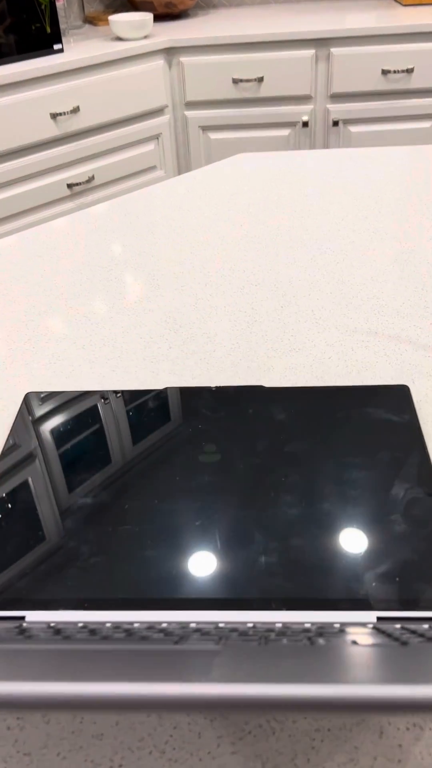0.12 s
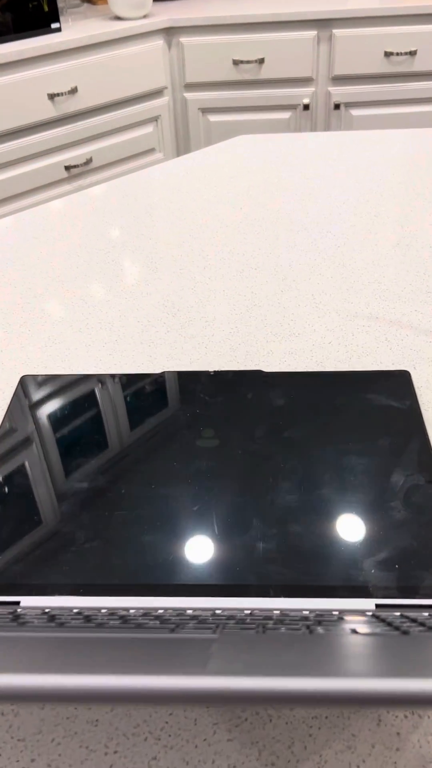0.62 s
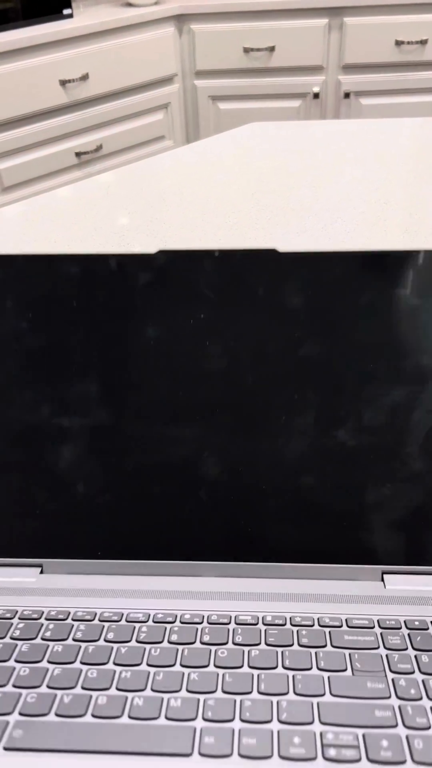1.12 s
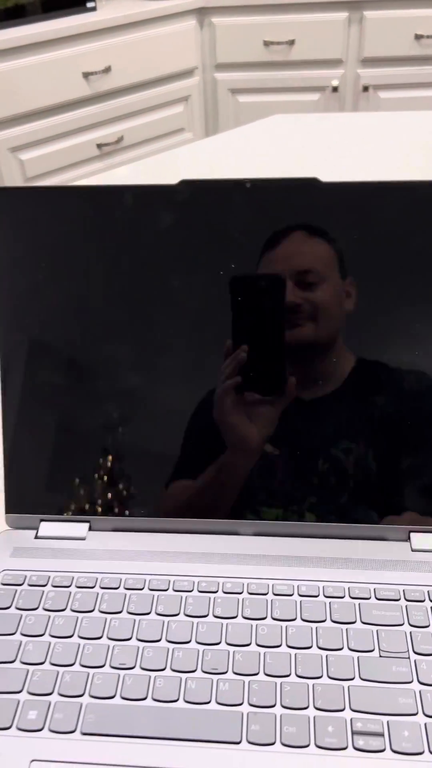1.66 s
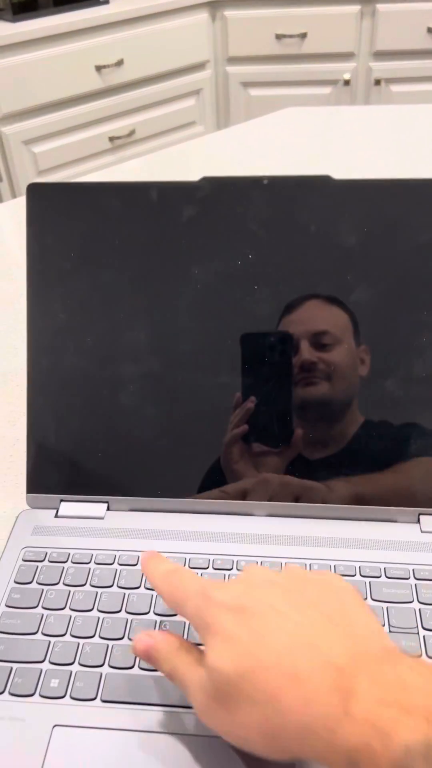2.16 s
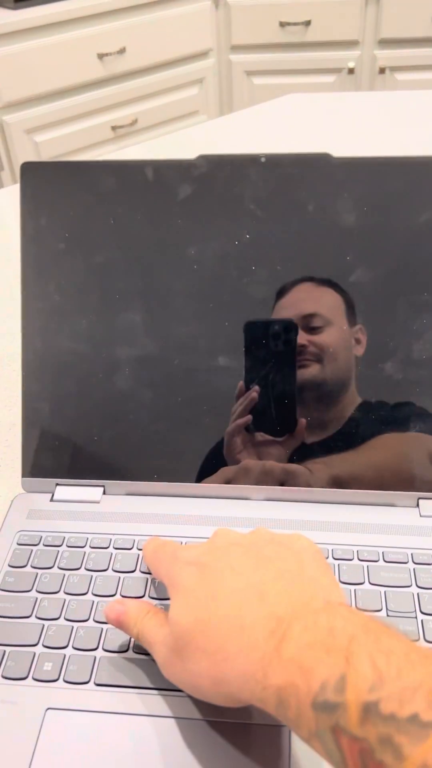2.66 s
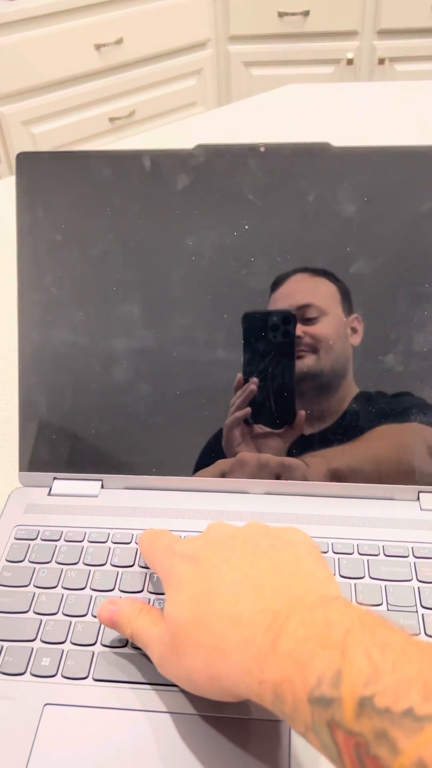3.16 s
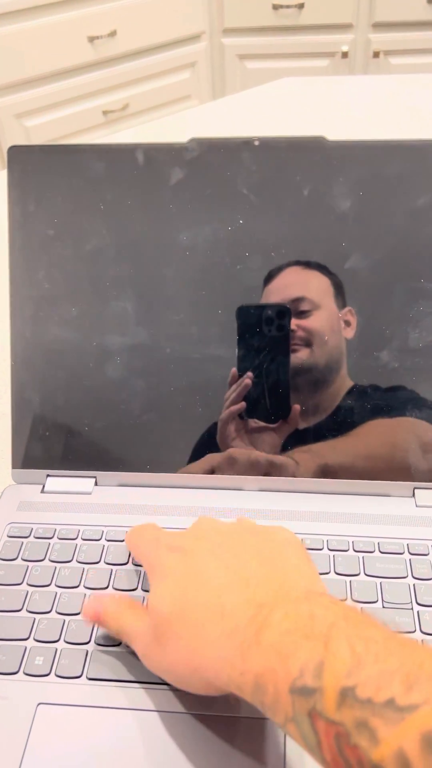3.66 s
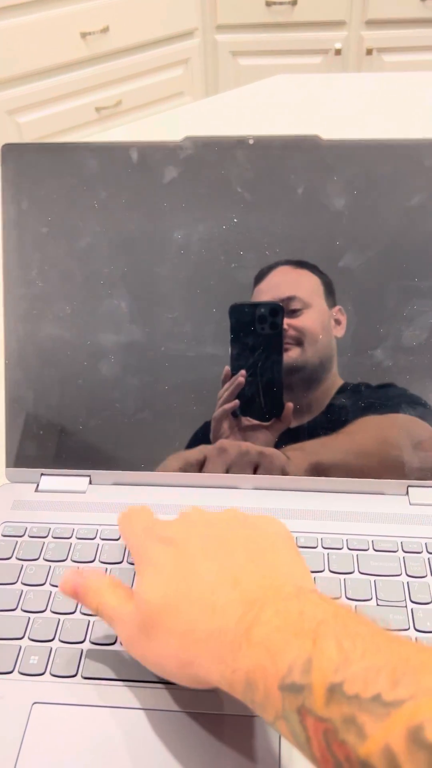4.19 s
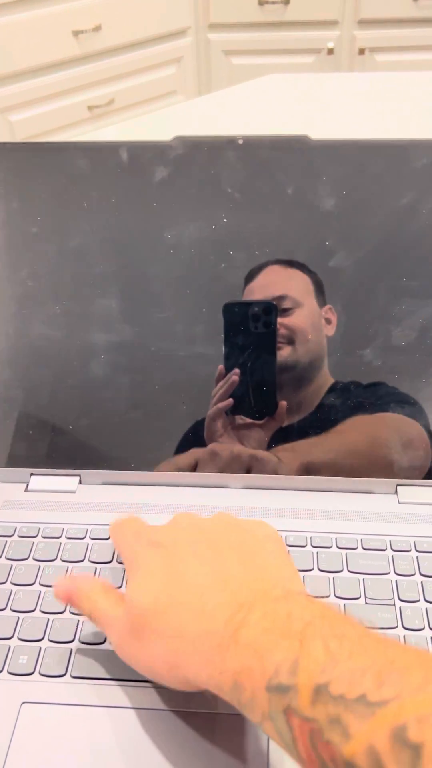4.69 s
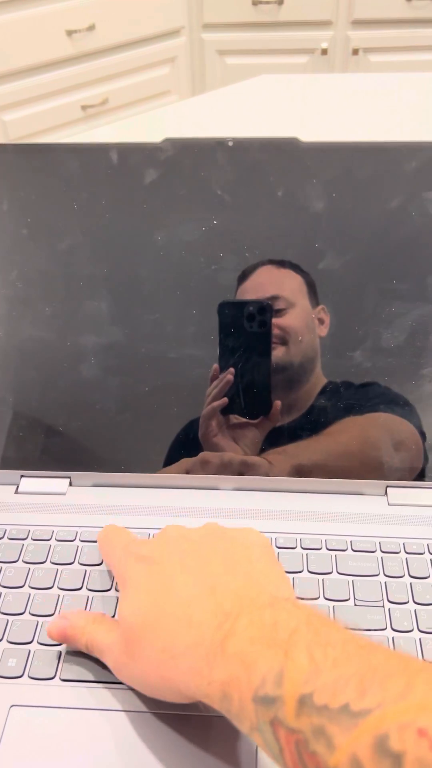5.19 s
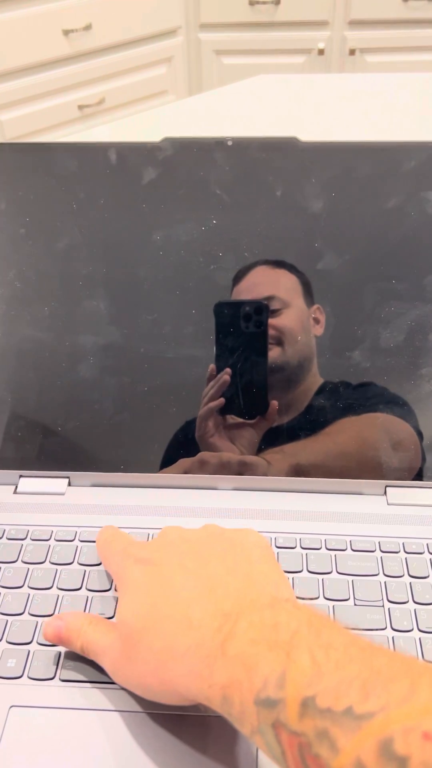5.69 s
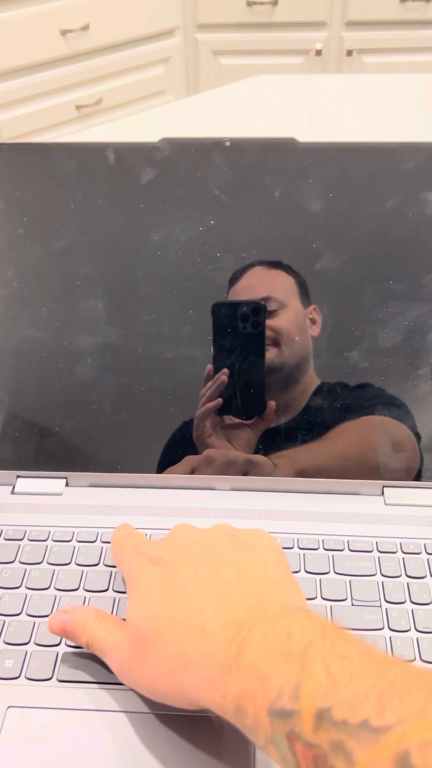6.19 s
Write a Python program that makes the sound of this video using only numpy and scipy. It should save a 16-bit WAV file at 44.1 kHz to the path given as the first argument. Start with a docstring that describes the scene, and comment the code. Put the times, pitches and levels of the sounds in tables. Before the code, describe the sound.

Close handheld stereo pickup in a hard-surfaced kitchen. Faint dry skin rubs and tiny ticks come first, then two sudden cracking knocks on a thin laptop case, with short mid-pitched ringing, a bounce and a low counter thump. Near quiet returns with barely audible brushing. Light, dry key clicks then run in a regular series, press and release, becoming softer and sparser towards the end over gentle appliance hum.

```python
"""Two hard knocks ring the case of a laptop, which bounces on the counter after each: ringing modes,
a noisy crack and a slow swell of the slab. Then a finger taps a key again and again, mostly lighter:
bursts of tiny contacts excite keycap resonances. A hand brushes the laptop (stick-slip hiss, catches,
ticks). Sparse echo taps make the room; shaped noise and fuzzy hums make the quiet kitchen behind it."""
import sys
import numpy as np
from scipy import signal
from scipy.fft import rfft, irfft, next_fast_len
from scipy.io import wavfile
from scipy.ndimage import uniform_filter1d

SR = 44100
rng = np.random.default_rng(int(sys.argv[2]) if len(sys.argv) > 2 else 0)


def voltage_ratio(decibels):
    """Convert decibels (scalar or array-like) to amplitude ratios, 20 dB per decade."""
    exponent = np.asarray(decibels, float) / 20
    return 10 ** exponent


def int16_out(signal):
    """Quantize to a 16-bit WAV file."""
    q = np.round(np.clip(np.atleast_2d(signal).T, -1, 1) * 32767)
    wavfile.write(sys.argv[1], SR, q.astype(np.int16))


N = 278834

# stereo spread of diffuse sound: (frequency [Hz], side gain [dB])
DIFFUSE_SIDE = [(30, -35.5), (60, -24.5), (110, -20), (200, -15.5), (380, -10.5), (700, -3), (1290, -5),
                (2380, -7.5), (4400, -1.5), (8120, -0.5), (15000, -1.5)]


def evened(x):
    """Scales to rms 1."""
    return x / np.sqrt(np.mean(x ** 2) + 1e-20)


def read(points, hz):
    """Value of a curve at hz, in straight lines over log frequency."""
    f, value = np.transpose(points)
    return np.interp(np.log(hz + 1), np.log(f + 1), value)


def add(mix, start_s, sound):
    """Mixes a sound in at start_s seconds."""
    part = mix[round(start_s * SR):][:len(sound)]
    part += sound[:len(part)]


def coloured(x, points, turn=1):
    """Filters by a spectrum in dB, with an optional phase turn."""
    length = x.shape[-1]
    size = next_fast_len(length + 512)
    gain = voltage_ratio(read(points, np.fft.rfftfreq(size, 1 / SR)))
    return irfft(rfft(x, size) * turn * gain, size)[..., :length]


def resonate(x, hz, width):
    """Resonance of gain 1: shifts hz down to zero, smooths, and shifts back."""
    turn = np.exp(2j * np.pi * np.cumsum(hz * np.ones(len(x))) / SR)
    r = np.exp(-np.pi * width / SR)
    smooth = signal.lfilter([1 - r], [1, -r], x / turn + 1e-18)
    return 2 * (turn * smooth).real


def resonate_twice(x, hz, width, second_width):
    """Two resonances in a row at one frequency, for steeper skirts."""
    return resonate(resonate(x, hz, width), hz, second_width)


def case(tilt_db, lag=.0009, ring=1, rise=0.00049, turns=0.64):
    """The struck case: bending waves bring the high modes first; each mode needs part of a turn to build."""
    # modes of the case: (frequency [Hz], relative level [dB], free ring t60 [s])
    modes = [(388.8, -2, 0.029), (481.4, -4.5, 0.017), (619, 1, 0.023), (837, -10.5, .012),
             (1064, -7, 0.017), (1261, -9.5, 0.018), (2434, 2.5, 0.0087), (2700, -12, 0.012),
             (3200, -0.5, 0.0045), (4340, -8, .008), (4710, -9, .01), (7270, -19, 0.012),
             (9754, -34, 0.0033)]
    hz, db, t60 = np.transpose(modes)[:, :, None]
    t = np.maximum(np.arange(9000) / SR - lag / (1 + (hz / 2200) ** 2), 0)
    decay = voltage_ratio(db + tilt_db * np.log2(hz / 1000) - 60 * t / (ring * t60))
    build = 1 - np.exp(-(t / (rise + turns / hz)) ** 2)
    # low neighbours swing opposite ways and merge; high ones leave gaps
    sides = (-1) ** np.cumsum(hz < 1500, axis=0)
    ringing = (sides * decay * build * np.sin(2 * np.pi * hz * t)).sum(0)
    # a small case radiates no bass
    thin = signal.butter(3, 280, "highpass", fs=SR, output="sos")
    sound = signal.sosfilt(thin, ringing)
    return sound / abs(sound).max()


def blow(db, tilt_db, lag, ring):
    """One impact: the modes of the case and the noisy crack of a hard edge."""
    # colour of the crack: (frequency [Hz], relative level [dB])
    crack_colour = [(1180, -34.5), (1800, -30), (2100, -9.5), (2430, -13.5), (5440, -23.5), (9060, -20.5),
                    (15600, -42), (16300, -54.5)]
    t = np.arange(1500) / SR
    noise = evened(coloured(rng.standard_normal(1500), crack_colour))
    crack = noise * voltage_ratio(-15.0 - 60 * t / 0.055) * (1 - np.exp(-t / 0.0014))
    sound = voltage_ratio(db - 0.5) * case(tilt_db, lag, ring)
    add(sound, 0, voltage_ratio(db) * crack)
    return sound


def knocks():
    """Blows with near echoes, a slab that swells late, and bounces; second output is what fills the room."""
    # knocks: (time [s], nominal level [dB], brightness [dB per octave], lag of the low modes [s],
    # ring length [share of the free ring])
    hits = [(1.593, -2.5, -0.5, .0003, 1.05), (1.8412, -9, 0.5, 0.00037, .7)]
    # the case bounces on the counter after a knock, columns as for the knocks
    bounces = [(1.6213, -21, -1, .0009, 0.49), (1.6248, -17, -0.5, .0005, 0.69),
               (1.8721, -14, -1.5, .0003, .8)]
    # modes of the slab: (frequency [Hz], level over the knock [dB], t60 [s], build-up [s])
    slab = [(44, -26, 0.42, .022), (76, -25.5, 0.19, 0.0073), (112, -26.5, .15, 0.004),
            (185.6, -29.5, 0.52, 0.032)]
    # colour thrown into the room in all directions: (frequency [Hz], relative level [dB])
    thrown_colour = [(40, -18.5), (110, -11.5), (250, -10.5), (400, -9.5), (620, -7.5), (900, -14),
                     (1700, -19.5), (2500, -19.5), (5000, -26), (9000, -27.5), (11000, -35), (16400, -43)]
    # counter and cupboards close by: (delay [s], level [dB])
    edges = [(.0066, -15.5), (.0125, -21), (.017, -19.5)]
    out, thrown = np.zeros(N), np.zeros(N)
    t = np.arange(SR // 3) / SR
    for start_s, db, *touch in hits:
        sound = blow(db, *touch)
        add(out, start_s - .0008, sound)
        for delay, edge_db in edges:
            add(out, start_s + delay, voltage_ratio(edge_db) * sound)
        for hz, slab_db, t60, build in slab:
            swell = (1 - np.exp(-(t / build) ** 2)) * voltage_ratio(db + slab_db - 60 * t / t60)
            add(out, start_s, swell * np.sin(2 * np.pi * hz * t))
        thrown[round(start_s * SR)] = voltage_ratio(db + 34.5)
    for start_s, *touch in bounces:
        softened = signal.lfilter([1 - .35], [1, -.35], blow(*touch))
        add(out, start_s, softened)
    return out, coloured(thrown, thrown_colour)


def rattle(length, rise=0.24):
    """Tiny contacts of uneven size that gather quickly and spread over the length in seconds."""
    t = np.arange(1200) / SR
    draw = rng.standard_normal((1200, 2))
    grains = draw[:, 0] * np.exp(.6 * draw[:, 1])
    u = t / max(length, .001)
    shape = (1 - np.exp(-u / rise)) * np.exp(-u ** 2) + 0.12 * np.exp(-t / 0.006)
    contacts = grains * shape
    return contacts / np.sqrt(np.mean(contacts[:250] ** 2))


def keys():
    """Plastic rattle in the keycap, a thin top tick, and a thump into the case in every key move."""
    # key pressed down, or a similar light key click (5.3976):
    # (time [s], plastic tick [dB], thump into the case [dB], top treble [dB]);
    # levels here and below are nominal, ahead of fixed trims
    presses = [(3.4657, -46, -46, -64), (3.6329, -47.5, -48.5, -65), (3.7976, -47, -51, -60.5),
               (3.9465, -53.5, -53, -84), (4.098, -51, -53, -81), (4.247, -51, -55.5, -75),
               (4.3994, -51.5, -52.5, -72), (4.5535, -56, -54.5, -85), (4.6919, -67, -61, -63),
               (4.8374, -61, -61.5, -67), (4.9935, -60, -60, -77.5), (5.1403, -64.5, -63, -75.5),
               (5.296, -68, -69.5, -81), (5.3976, -62.5, -68.5, -80.5), (5.5769, -70.5, -67, -84.5),
               (5.7638, -59, -67, -89), (6.303, -61.5, -54, -87)]
    # key springing back up, with one small bounce after it (5.2617):
    # (time of the thump [s], plastic tick [dB], top treble [dB])
    releases = [(3.5399, -56, -63), (3.7007, -54.5, -66), (3.8588, -60.5, -66.5), (4.012, -58, -67),
                (4.1597, -56.5, -68), (4.311, -61.5, -69), (4.466, -54, -65), (4.6208, -62.5, -70.5),
                (4.7721, -59, -70), (4.917, -56.5, -64), (5.0784, -61, -68.5), (5.2466, -58, -81.5),
                (5.2617, -62, -80), (5.4439, -68, -88), (5.5603, -66, -82.5), (5.6133, -71.5, -93),
                (5.7418, -60, -77), (5.9068, -63, -78)]
    # keycap resonances, low three thump, high three tick:
    # (centre before scatter [Hz], width of first pass [Hz], relative level [dB])
    cap_modes = [(1050, 760, 1), (1900, 1440, -5.5), (2690, 130, -86), (4040, 1340, 1.5),
                 (7190, 2100, -0.5), (9700, 2000, 1)]
    press_rattle_s, release_rattle_s = 0.00476, .0048
    release_lead_s = .0015  # the cap starts to rattle just before it hits its stop
    travel_s, slower_s_per_db, firm_db = .0015, .0002, -46  # a light finger bottoms out later
    release_thump_db = -5  # thump in the release table's moves, relative to the tick

    top = signal.butter(4, [12600, 15800], "bandpass", fs=SR, output="sos")
    dull = signal.butter(3, 11500, fs=SR, output="sos")  # the cap itself rings little above this
    moves = []
    for start_s, tick_db, thump_db, top_db in presses:
        travel = travel_s + slower_s_per_db * (firm_db - thump_db)
        moves.append((start_s, tick_db, thump_db, top_db, press_rattle_s, travel))
    for stop_s, tick_db, top_db in releases:
        thump_db = tick_db + release_thump_db
        moves.append((stop_s - release_lead_s, tick_db, thump_db, top_db, release_rattle_s, release_lead_s))

    out = np.zeros(N)
    for start_s, tick_db, thump_db, top_db, length, travel in moves:
        contacts, landing = rattle(length), rattle(1.29 * length)
        shift = 1 + 0.04 * rng.standard_normal(len(cap_modes))  # the finger never lands twice alike
        rings = [(hz * k, width, voltage_ratio(db)) for k, (hz, width, db) in zip(shift, cap_modes)]
        tick = sum(g * resonate_twice(contacts, hz, width, 2 * width) for hz, width, g in rings[3:])
        thump = sum(g * resonate_twice(landing, hz, width, 2 * width) for hz, width, g in rings[:3])
        add(out, start_s, voltage_ratio(tick_db - 4.5) * signal.sosfilt(dull, tick))
        add(out, start_s, voltage_ratio(top_db + 5) * signal.sosfilt(top, rattle(0.52 * length)))
        add(out, start_s + travel, voltage_ratio(thump_db + 8.0) * thump)
        add(out, start_s + travel, voltage_ratio(thump_db + 4.5) * case(-7.0))  # the case answers softly
    return out


def rubs():
    """Skin slides on a smooth surface: stick-slip grains in a broad resonance, with a few larger catches."""
    # slides: (time of most pressure [s], level [dB], centre [Hz], swell [dB per s], fade [dB per s])
    slides = [(0.77, -57.5, 7160, 474, 1003), (1.518, -61, 8810, 800.5, 598),
              (2.343, -83.5, 7770, 699.5, 500), (2.8, -86.5, 7900, 417, 500),
              (3.214, -79, 8300, 700.5, 450), (6.1, -88, 8870, 420, 401.5)]
    # the skin sticks and lets go: (time [s], nominal level [dB], length [s])
    catches = [(0.748, -46, 0.006), (0.7662, -42, 0.0042)]
    # resonances of a catch: (frequency [Hz], width of each pass [Hz], relative level [dB])
    catch_rings = [(7800, 1000, 1), (6200, 800, -2), (4600, 2100, -7.5),
                   (2530, 3600, -21), (9000, 1600, -13), (15000, 3100, -28)]
    reach_s = .12  # each slide is computed this long before and after its peak
    out, t = np.zeros(N), np.arange(-reach_s, reach_s, 1 / SR)
    for peak_s, db, hz, swell, fade in slides:
        grains = rng.standard_normal(len(t))
        hiss = resonate_twice(grains, hz, 2200, 4000) + .5 * resonate(grains, hz, 400)
        pressure_db = np.where(t < 0, swell * t, -fade * t)
        add(out, peak_s - reach_s, voltage_ratio(db + pressure_db) * evened(hiss))
    for start_s, db, length in catches:
        grains = rattle(length)
        catch = sum(voltage_ratio(ring_db) * resonate_twice(grains, hz, width, width)
                    for hz, width, ring_db in catch_rings)
        add(out, start_s, voltage_ratio(db + 1.5) * catch)
    return out


def ticks():
    """Small ticks as the hand shifts, and one dull key thump: short rattles, each in one broad ring."""
    # small ticks as the hand shifts on the laptop, and one dull key thump at 5.41:
    # (time [s], rattle level before the ring [dB], ring [Hz], width of each pass [Hz])
    small_sounds = [(0.585, -74.5, 9660, 4970), (0.8478, -76, 8800, 1500), (1.16, -63.5, 3200, 2500),
                    (1.476, -65, 3200, 1190), (5.312, -74.5, 3500, 4000), (5.41, -63, 2000, 2000),
                    (5.461, -76, 9000, 3000), (5.638, -77, 9500, 3000), (5.818, -77.5, 10000, 2500)]
    out = np.zeros(N)
    for start_s, db, hz, width in small_sounds:
        add(out, start_s, voltage_ratio(db) * resonate_twice(rattle(.0045), hz, width, width))
    return out


def kitchen(x):
    """Room echo: sparse taps of random sign, each band dying at its own speed, as mid and side."""
    # decay of the room: (frequency [Hz], t60 [s])
    decay = [(100, 0.68), (260, 0.35), (700, 0.62), (1840, 0.43), (4850, 0.52), (12800, 0.22)]
    # colour of the echo: (frequency [Hz], gain [dB])
    wet_colour = [(100, -2), (500, -10), (2000, -7.5), (6000, -11), (14000, -9.5)]
    taps = np.zeros((2, SR))
    at = np.arange(300, SR - 20, 20) + rng.integers(0, 20, (2, (SR - 301) // 20))
    np.put_along_axis(taps, at, rng.choice([-1., 1.], at.shape), 1)
    hz, t, z = signal.stft(taps, SR, nperseg=512)
    t60 = np.maximum(read(decay, hz), .05)[:, None]
    tail = signal.istft(z * voltage_ratio(-60 * t / t60), SR, nperseg=512)[1]
    tail = tail / np.linalg.norm(tail[0])
    echo = signal.fftconvolve(x[None], tail, axes=1)[:, :N]
    mid, side = coloured(echo, wet_colour)
    return np.array([mid, voltage_ratio(-3.0) * coloured(side, DIFFUSE_SIDE)])


def room_tone():
    """Air handling and appliances: a soft noise wash with fuzzy hums, as mid and side."""
    # colour of the wash: (frequency [Hz], relative level [dB])
    air_colour = [(20, -45.5), (35, -27), (50, -3), (130, -4.5), (300, -7.5), (700, -15.5), (1400, -23),
                  (2000, -32.5), (3200, -39), (5500, -48.5), (8000, -49), (11000, -54), (13500, -72.5),
                  (16400, -65.5)]
    # hums: (frequency [Hz], width of each pass [Hz], level ahead of the side filter [dB])
    hums = [(57, 4.1, -63.5), (118.1, 8.4, -63), (223.3, 30, -75.5), (341, 64, -64.5),
            (650.5, 167.4, -68.5), (2500, 600, -84.5), (4690, 300, -89.5)]
    air_db = -57  # rms of the wash in the mid, before the hums
    frames, hz = N // 512 + 5, np.fft.rfftfreq(2048, 1 / SR)
    a, b, c, d, patches = rng.standard_normal((frames, 1025, 5)).T
    # level patches, smoothed over frequency and then over time
    patches = evened(uniform_filter1d(uniform_filter1d(patches, 20, 0), 8, 1))
    z = np.array([a + 1j * b, c + 1j * d]) * voltage_ratio(read(air_colour, hz)[:, None] + 0.57 * patches)
    wash = signal.istft(z, nperseg=2048, noverlap=1536)[1][:, :N]
    wash *= voltage_ratio(air_db) / wash[0].std()
    for f, width, db in hums:
        # each hum swells and sags
        waver = evened(resonate_twice(rng.standard_normal(N), 1.7, 4., 4.))
        for channel in wash:
            noise = rng.standard_normal(N) * voltage_ratio(1.5 * waver)
            add(channel, 0, voltage_ratio(db) * evened(resonate_twice(noise, f, width, width)))
    return np.array([wash[0], coloured(wash[1], DIFFUSE_SIDE)])


def scene():
    """Direct sounds reach the two microphone ports slightly out of phase; room and air are diffuse."""
    # stereo spread of direct sound: (frequency [Hz], side over mid [dB])
    near_side = [(30, -34), (60, -27.5), (110, -22.5), (200, -16.5), (380, -22.5), (700, -17.5),
                 (1290, -22.5), (2380, -12), (4400, -5.5), (8120, -1.5), (15000, -1.5)]
    knocked, thrown = knocks()
    tapped = keys()
    rubbed = rubs() + ticks()
    near = knocked + tapped + rubbed
    direct = np.array([near, coloured(near, near_side, turn=-1j)])
    room = kitchen(thrown + voltage_ratio(-3.0) * tapped + voltage_ratio(-11.5) * rubbed)
    mid, side = direct + room + room_tone()
    return np.array([mid + side, mid - side])


def low_pass(x):
    """Removes everything above the highest recorded frequency."""
    return signal.sosfilt(signal.butter(12, 16470, fs=SR, output="sos"), x)


def record(dry):
    """The phone's microphone drops the deepest bass."""
    bass_cut = signal.butter(2, 30, "highpass", fs=SR, output="sos")
    heard = signal.sosfilt(bass_cut, dry)
    return low_pass(heard)


dry = scene()
out = record(dry)
int16_out(out)
```